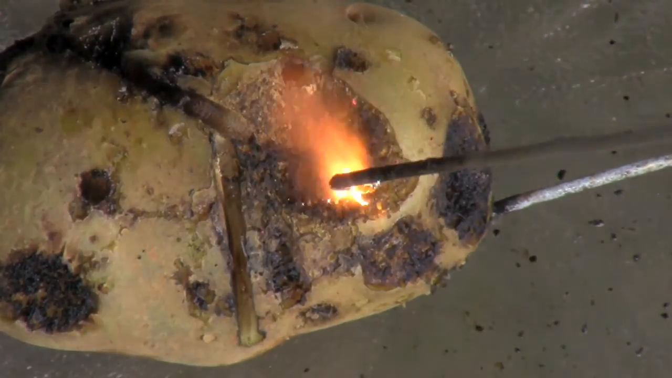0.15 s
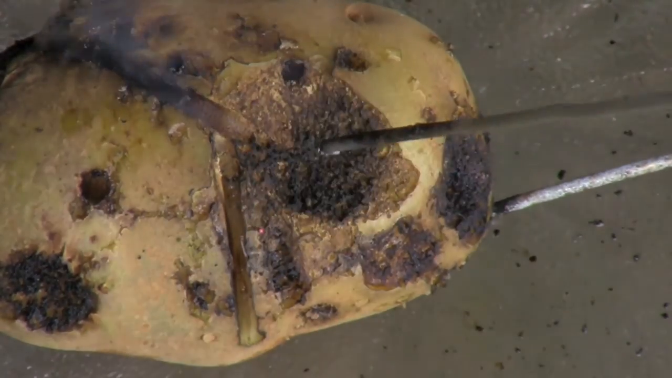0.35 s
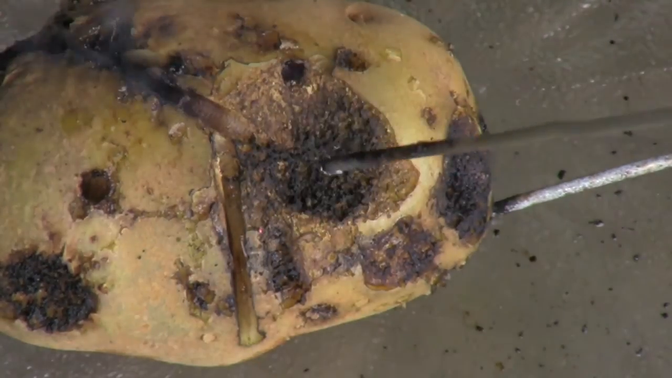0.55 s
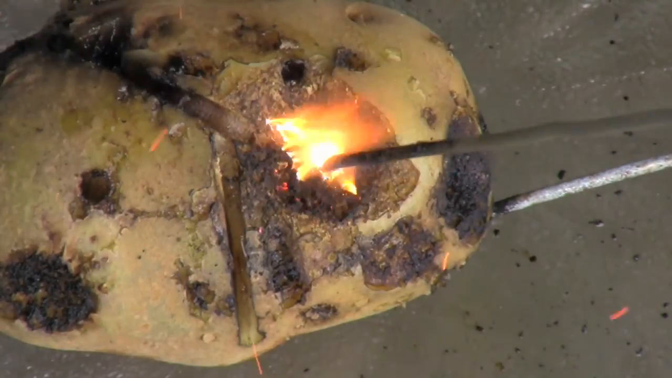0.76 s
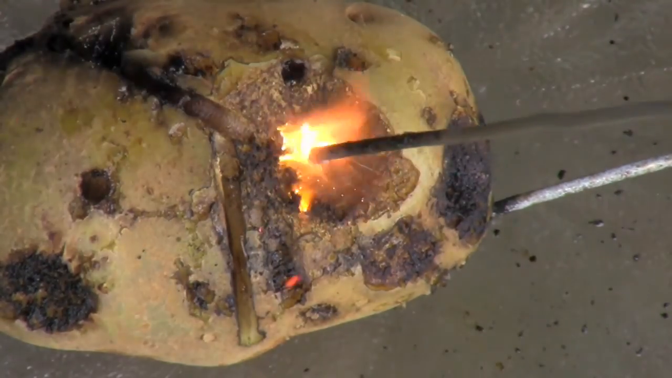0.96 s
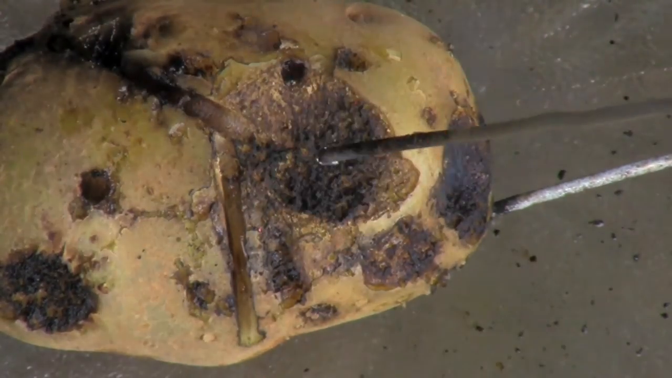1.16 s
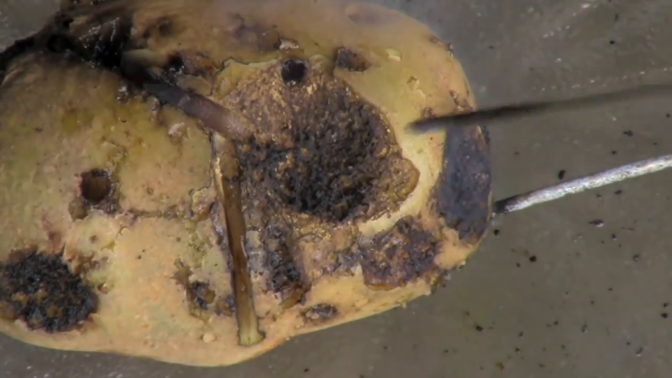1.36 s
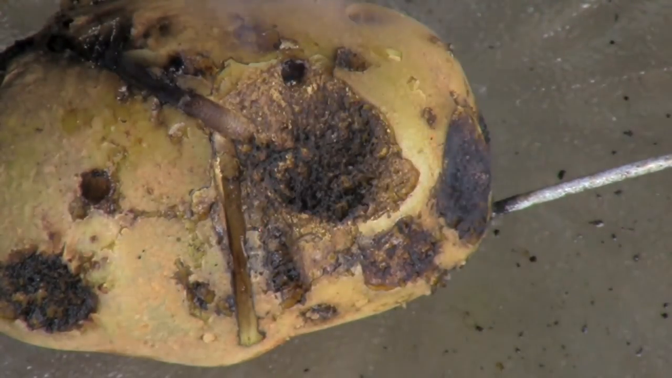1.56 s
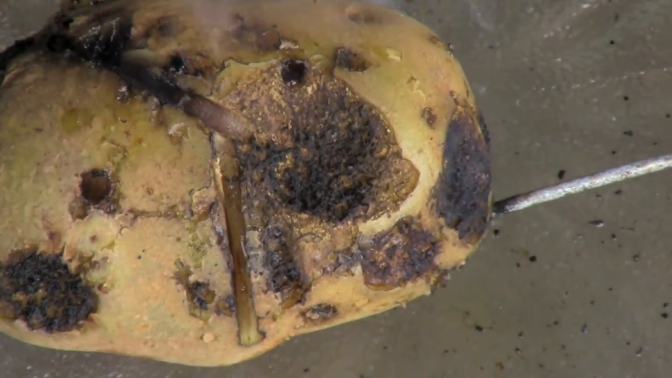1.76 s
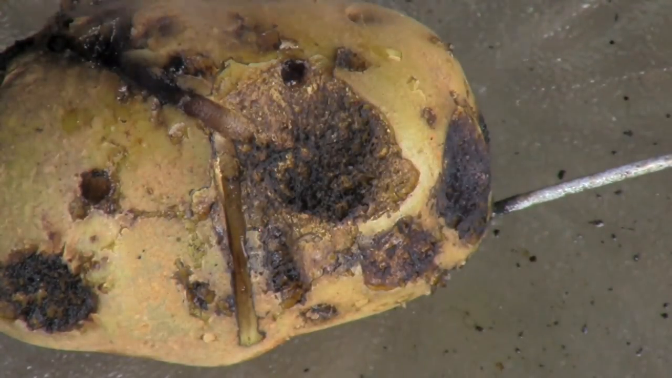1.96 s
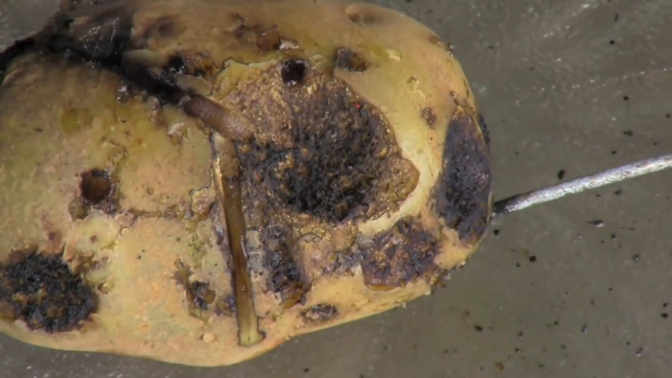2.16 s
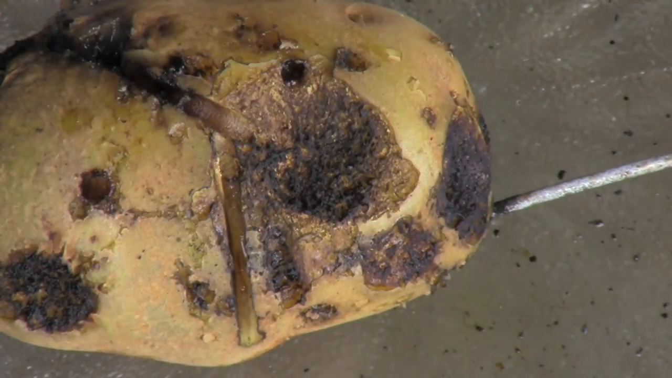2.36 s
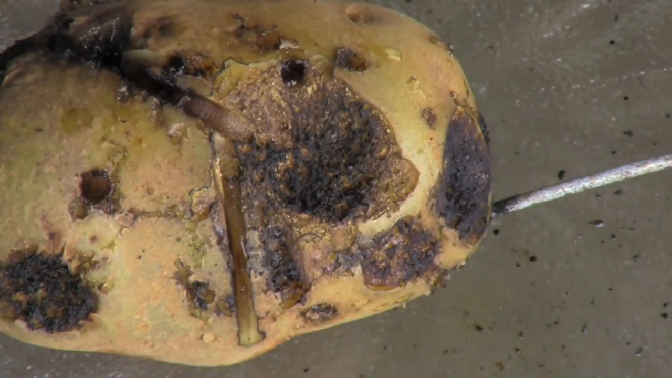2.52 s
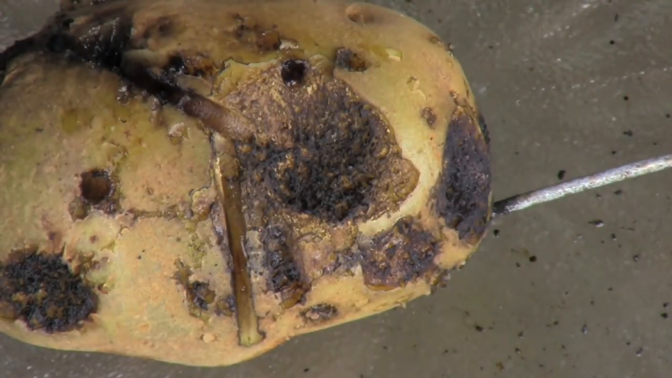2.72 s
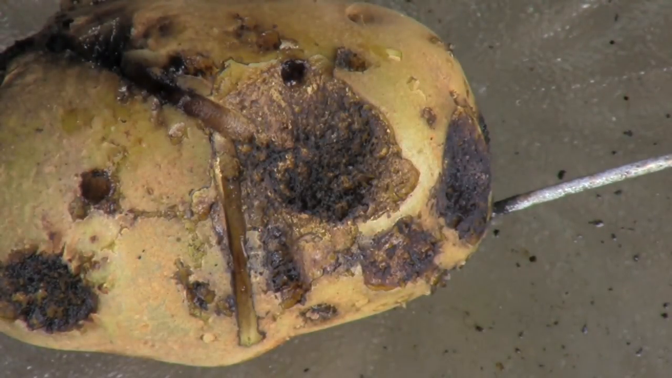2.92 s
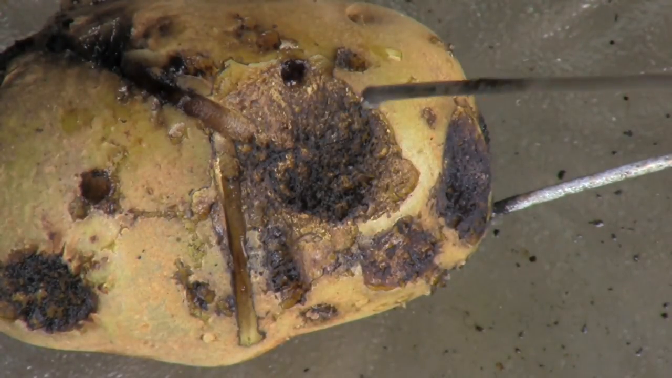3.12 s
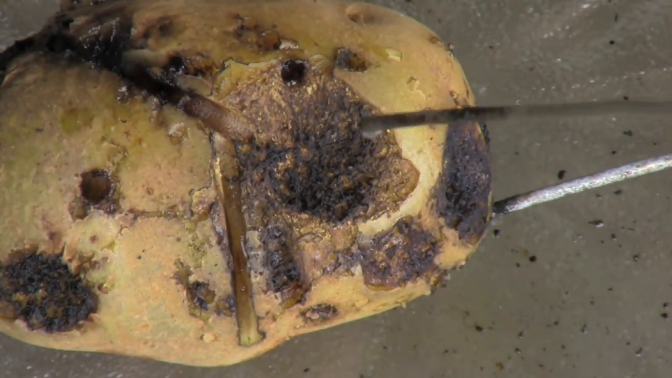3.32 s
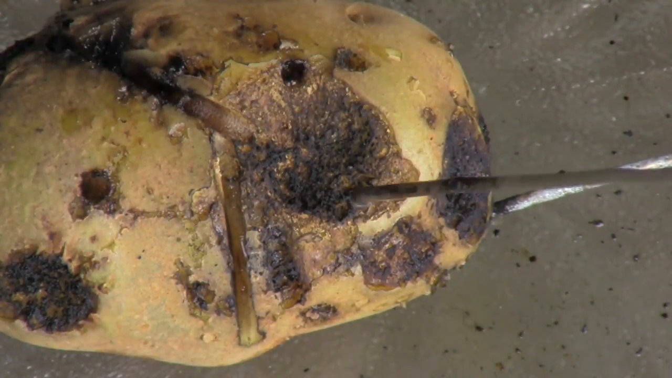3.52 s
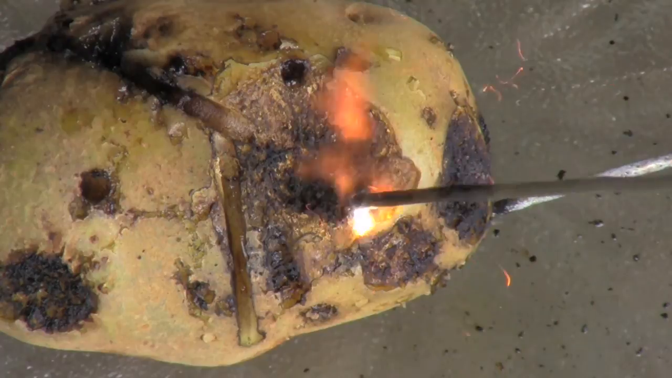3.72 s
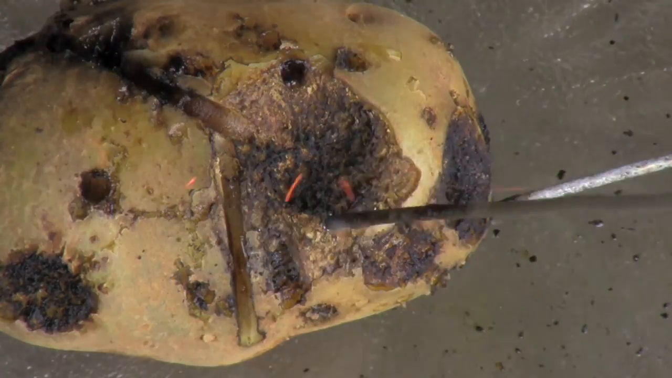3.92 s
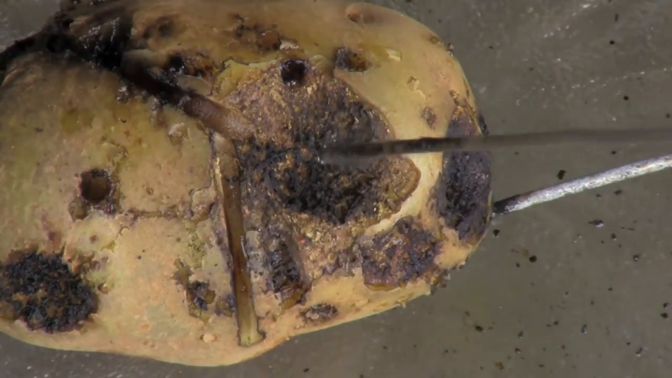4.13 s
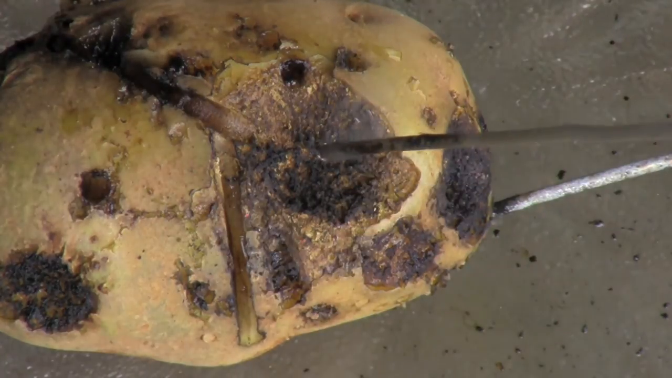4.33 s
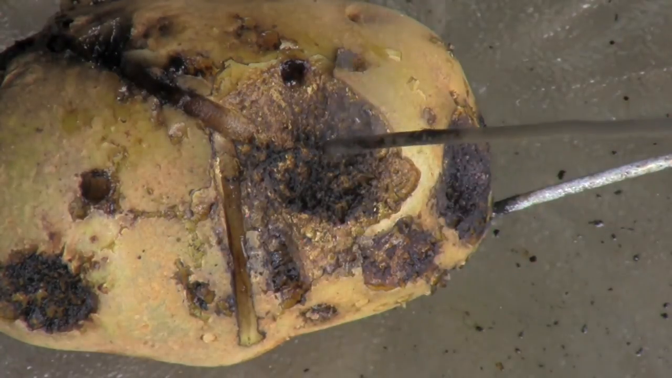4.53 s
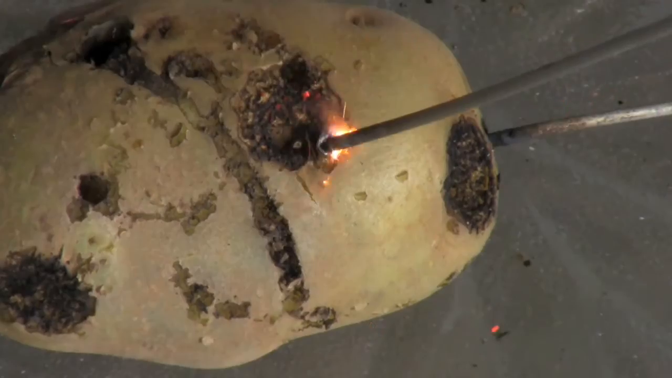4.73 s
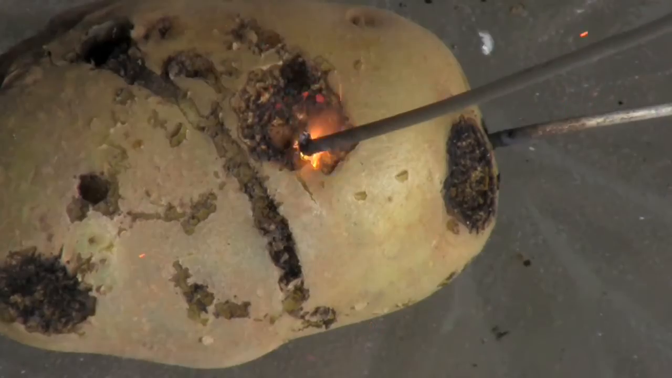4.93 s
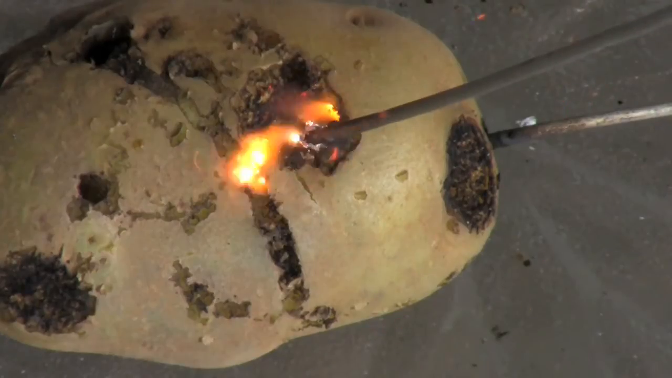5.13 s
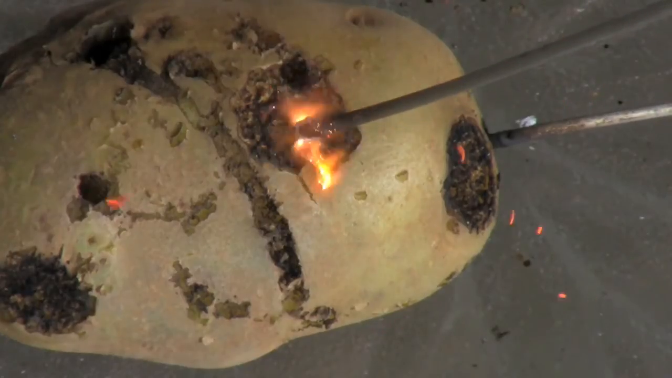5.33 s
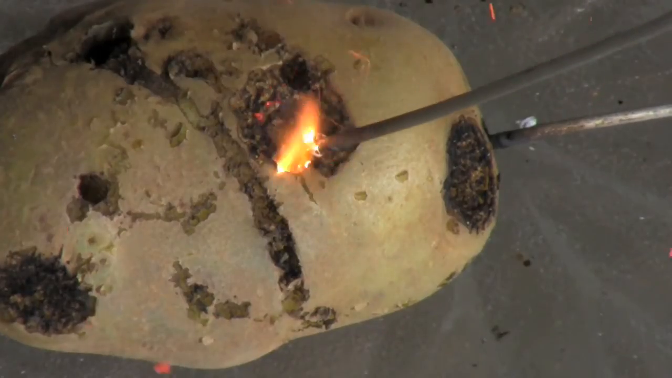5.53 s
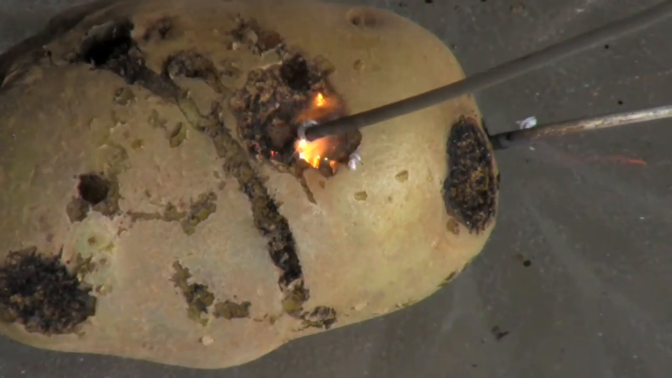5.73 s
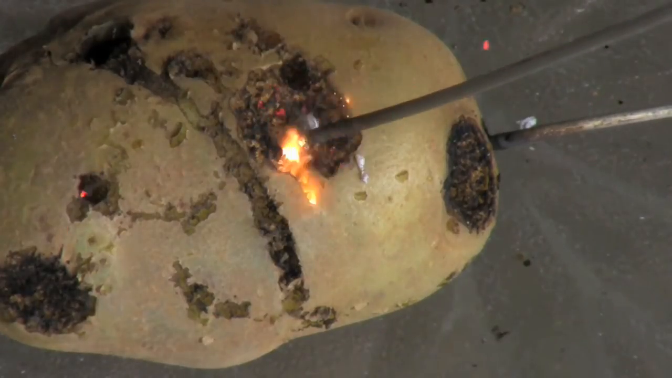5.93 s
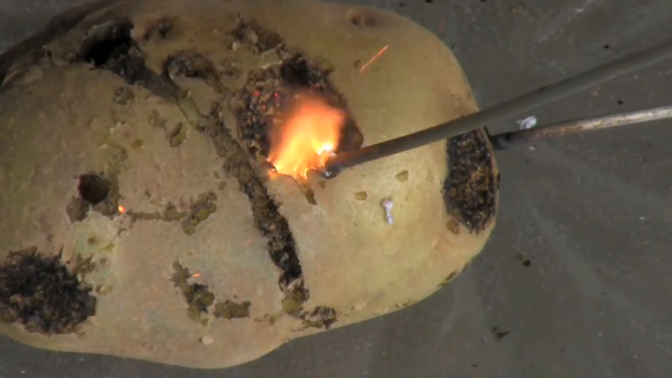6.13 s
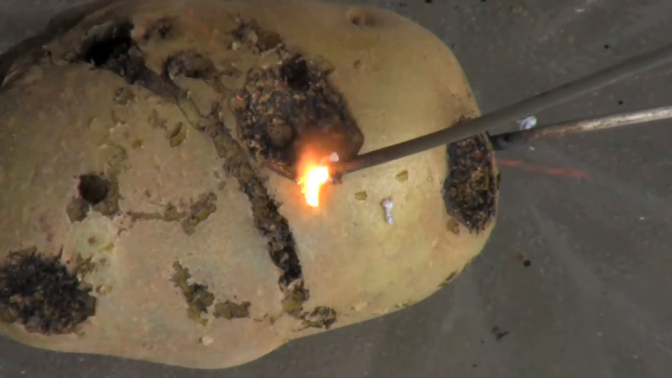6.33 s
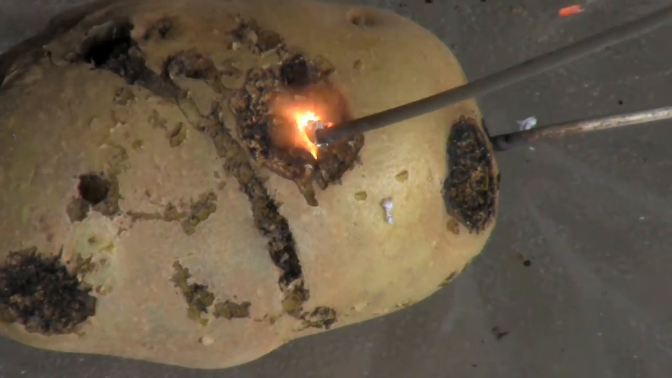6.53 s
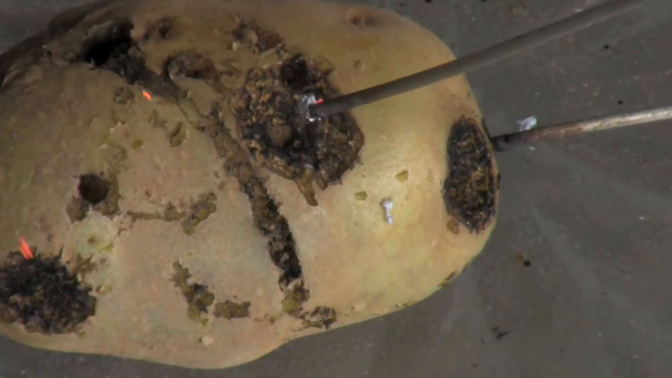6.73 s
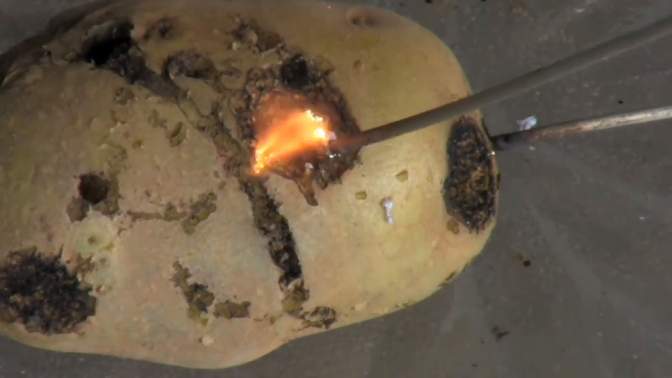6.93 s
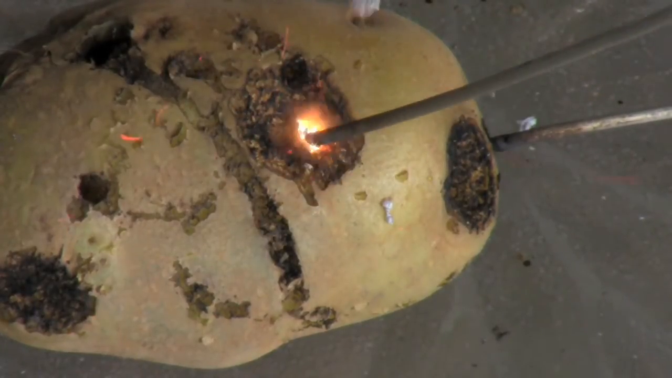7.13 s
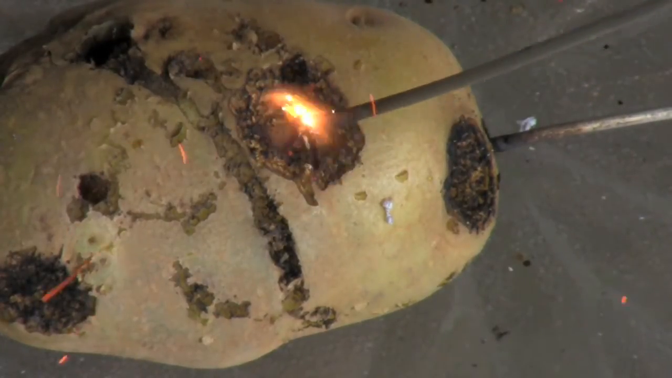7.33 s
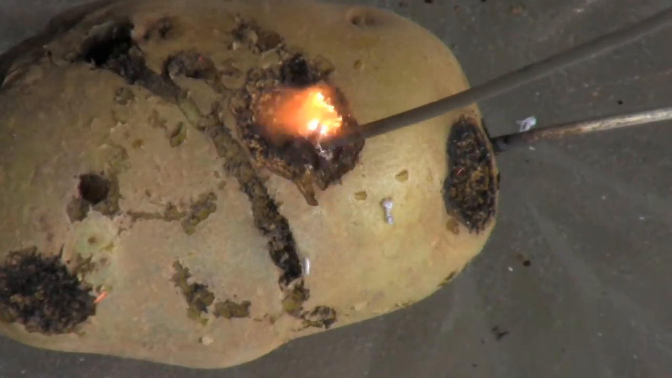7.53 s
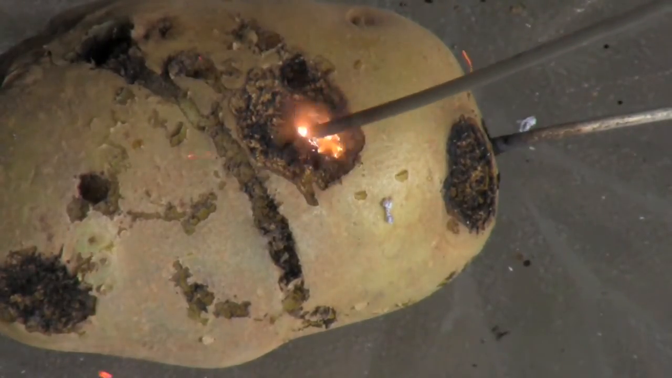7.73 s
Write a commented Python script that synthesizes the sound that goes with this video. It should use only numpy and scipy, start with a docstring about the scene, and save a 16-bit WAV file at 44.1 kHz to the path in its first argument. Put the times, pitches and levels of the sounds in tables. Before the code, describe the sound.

Close stereo pickup in a small, hard room. At once a harsh electric arc buzzes at twice the mains rate, crackling with a fluttering low flame until 0.3 s, then cuts to a short reverberant tail and faint hum. A second, brighter burst snaps on at 0.7 s and stops at 1.2 s. Low room noise rises in the pause; tiny ticks lead to a sharp double steam spit at about 2.15 s, a sizzle dying by 2.6 s, and thin, slightly falling whistles around 2.3, 3 and 3.5 s. From 3.7 to 4.0 s the arc sputters with several hard snaps. Quiet ticks and a faint high whistle follow. A long, dense rasping buzz runs from 4.7 to 6.65 s, with snaps and flame flares, most around 5.5, 5.9 and 6.5 s. After a short break, a steadier burst buzzes from 7.0 s to nearly 7.8 s.

```python
"""High-voltage arc burning a potato

A mains arc burns into a potato in five bursts, close to a microphone pair in a small hard room.
Each half cycle strikes a cluster of spark impulses, one polarity harder; noise fries in between.
Low puffs of hot gas make the fluttering flame, and sines at mains multiples make the supply's hum.
Now and then the arc sputters or the char flares. In the pause a steam pocket bursts as banded noise,
sizzles out, and steam whistles faintly from the charred skin as gliding, ragged sines."""
import sys
import numpy as np
from scipy import signal
from scipy.fft import rfft, irfft, next_fast_len
from scipy.io import wavfile
from scipy.ndimage import uniform_filter1d, minimum_filter1d, map_coordinates

SR = 44100
rng = np.random.default_rng(int(sys.argv[2]) if len(sys.argv) > 2 else 0)


def log_audio(samples):
    """Write samples as a 16-bit WAV file to the path given in sys.argv[1]."""
    # one column per channel
    frames = np.atleast_2d(samples).T
    # limit to full scale, then quantise
    limited = np.clip(frames, -1, 1)
    pcm = np.round(limited * 32767).astype(np.int16)
    wavfile.write(sys.argv[1], SR, pcm)


N = 342657
T = np.arange(N) / SR  # time in s
MAINS_HZ = 60

# arc bursts: start_s (first strong discharge), end_s, crackle_db, weak_polarity_db (against the strong one),
# scatter_db (between discharges), flame_db, hum_db
ARC_BURSTS = [(.0023, 0.292, -22, -5.5, 6, -30.5, -44.5), (0.7023, 1.19, -18.5, -7.5, 4, -36.5, -43.5),
              (3.685, 4.033, -18.5, -11, 5.5, -42.5, -41), (4.7299, 6.663, -19.5, -9.5, 2.5, -53, -43.5),
              (6.9964, 7.781, -18, -8, 0.44, -48, -41)]
# the arc loses its footing and sputters: middle_s, half_length_s, depth_db
SPUTTER_DIPS = [(.033, .01, 13), (.128, 0.014, 10.5), (.98, 0.016, 12), (3.873, 0.016, 9.5),
                (4.02, 0.027, 7), (4.73, 0.033, 16.5), (6.33, .09, 3.5), (6.428, 0.013, 9)]
# the char catches fire and the flame flares: middle_s, half_length_s, rise_db
FLAME_FLARES = [(.715, .025, 7.5), (1.09, 0.057, 8.5), (3.71, .025, 5.5), (3.925, 0.045, 12.5),
                (4.025, .035, 13.5), (5.45, .14, 14.5), (5.93, 0.25, 15.5), (6.56, .1, 14),
                (7.03, .03, 11.5)]


def amp(db):
    """Decibels to gain."""
    return 10 ** (np.asarray(db) / 20)


def unit(x):
    """x at rms 1."""
    return x / np.sqrt(np.mean(x ** 2) + 1e-20)


def along(points, hz):
    """(Hz, value) points read on a log frequency axis."""
    f, v = np.transpose(points)
    return np.interp(np.log(hz + 1), np.log(f + 1), v)


def bumps(resonances, hz):
    """The summed dB gain of bell-shaped (Hz, width Hz, dB) resonances."""
    return sum(db * np.exp(-((hz - centre) / width) ** 2 / 2) for centre, width, db in resonances)


def swells(rows, at):
    """The summed dB of bell-shaped (middle s, half length s, dB) swells at the given times."""
    return sum(db * np.exp(-((at - s) / half_s) ** 2) for s, half_s, db in rows)


def gate(start, end, fade):
    """One between two times, with ramps outside them."""
    return np.clip(np.minimum(T - start, end - T) / fade + 1, 0, 1)


def wobble(rate):
    """A smooth random curve, rate knots a second."""
    knots = rng.standard_normal(int(N * rate / SR) + 4)
    return map_coordinates(knots, [T * rate])


def filtered(x, response):
    """x filtered by response(Hz)."""
    m = next_fast_len(N + SR // 2)
    hz = np.fft.rfftfreq(m, 1 / SR)
    return irfft(rfft(x, m) * response(hz), m)[..., :N]


def noise(shape):
    """Noise of rms 1 whose dB spectrum is shape(Hz)."""
    return unit(filtered(rng.standard_normal(N), lambda hz: amp(shape(hz))))


def ring(x, shape, size=8192):
    """x through the causal, minimum-phase filter of energy 1 whose dB spectrum is shape(Hz)."""
    cepstrum = irfft(np.log(amp(shape(np.fft.rfftfreq(size, 1 / SR)))))
    # folding the cepstrum forward makes the filter answer as early as it can
    cepstrum[1:size // 2] *= 2
    cepstrum[size // 2 + 1:] = 0
    kernel = irfft(np.exp(rfft(cepstrum)))
    return signal.fftconvolve(x, kernel / np.linalg.norm(kernel))[:N]


def clusters(times, db, spread, uneven_db, count, signs=(-1, 1)):
    """A cluster of impulses around each time; db is its rms over half a mains cycle."""
    shape = (len(times), count)
    # a fast strike, a slower quench
    at = times[:, None] + spread * np.sqrt(6) * rng.triangular(-.85, -.35, 1.2, shape)
    size = rng.choice(signs, shape) * amp(uneven_db * rng.standard_normal(shape))
    half_cycle_norm = np.sqrt(SR / MAINS_HZ / 2)
    size *= (amp(db) * half_cycle_norm / np.linalg.norm(size, axis=1))[:, None]
    inside = (at >= 0) & (at < N / SR)
    return np.bincount((at[inside] * SR).astype(int), size[inside], N)[:N]


def background():
    """Room noise from all around: independent middle and side noises under one level curve."""
    # the level, which dips briefly before the fourth burst: time_s, level_db
    level = [(0, -64), (1.5, -62.5), (2.05, -54.5), (3.0, -55.5), (3.65, -55.5), (4.4, -53.5), (4.64, -56),
             (4.715, -71), (4.8, -61), (7.77, -64.5)]
    # spectrum of the air noise: frequency_hz, relative_db
    air_spectrum = [(15, -45.5), (25, -26.5), (45, -13), (86, -6), (170, -5), (270, -10.5), (330, -14),
                    (550, -12.5), (800, -12.5), (1200, -17), (1700, -24.5), (3200, -28), (6000, -37.5),
                    (11000, -45), (15000, -58)]
    # how diffuse it is: frequency_hz, side_over_mid_db
    air_width = [(60, -12.5), (180, -13.5), (550, -3.5), (1650, -5.5), (4970, -2.5), (15000, 0.5)]
    gain = amp(np.interp(T, *np.transpose(level)))
    mid, side = (gain * noise(lambda hz: along(air_spectrum, hz)) for _ in range(2))
    return mid, filtered(side, lambda hz: amp(along(air_width, hz)))


def mains_lines(lines):
    """Sines at mains multiples, each with its own phase and wavering level."""
    phase = 2 * np.pi * MAINS_HZ * T
    out = np.zeros(N)
    for multiple, db in lines:
        out += amp(db + wobble(12)) * np.sin(round(multiple) * phase + rng.uniform(0, 2 * np.pi))
    return np.sqrt(2) * out  # so that the dB are rms


def hum(fade=0.01):
    """The arc's heat swings with the mains current, more so when it flares; a faint hum always stays."""
    # harmonics under load, against each burst's hum level: mains_multiple, relative_db
    load_lines = [(1, -14.5), (2, 1.5), (3, -14), (4, 2), (5, -11), (6, -9.5), (7, -13), (8, -9.5),
                  (10, -14)]
    # the supply without load: mains_multiple, level_db
    idle_lines = [(1, -68.5), (2, -75), (3, -70.5), (4, -72)]
    hum_per_flame = .2  # a bigger flame draws more current: dB of hum per dB of flare
    load = sum(gate(start + fade, end, fade) * amp(hum_db) for start, end, *_, hum_db in ARC_BURSTS)
    load = load * amp(hum_per_flame * swells(FLAME_FLARES, T))
    return load * mains_lines(load_lines) + mains_lines(idle_lines)


def frying():
    """Thin, very uneven noise between the discharges, sinking when the arc sputters."""
    frying_db = -10.5  # against the crackle
    level = np.zeros(N)
    for start, end, crackle_db, *_ in ARC_BURSTS:
        level += gate(start, end, 0.0034) * amp(crackle_db + frying_db)
    grains = rng.standard_normal(N) * amp(7.6 * rng.standard_normal(N))
    return level * amp(-swells(SPUTTER_DIPS, T)) * unit(grains)


def surroundings(sparks):
    """Gives the sparks their spectrum and the resonances of the surroundings."""
    # the sparks' smooth spectrum: frequency_hz, relative_db
    spark_spectrum = [(30, -40), (80, -20.5), (120, -7.5), (300, 0.5), (600, -3.5), (1200, 0.5),
                      (2500, 0.5), (5200, -3.5), (8500, -6), (11000, -11.5), (13000, -13.5), (14300, -32),
                      (15200, -42.5)]
    # resonances and notches before the microphones are moved: centre_hz, width_hz, gain_db
    colour_before = [(208, 14, -6.5), (410, 46, -2.5), (555, 10, 5.5), (740, 83, 4.5), (1000, 70, 1.5),
                     (1800, 220, 6.5), (2650, 240, -1.5), (3390, 440, 9), (4230, 530, 8.5),
                     (6300, 120, 2.5), (7600, 350, 4), (11900, 250, -9)]
    # the same after the move: centre_hz, width_hz, gain_db
    colour_after = [(210, 8.9, -5), (324, 23, 3), (506, 18, -12), (766, 52, 4.5), (1210, 100, -3.5),
                    (1940, 180, 5.5), (3120, 274, 9.5), (3950, 357, 11.5), (6200, 170, 4.5),
                    (7550, 360, 6.5), (11850, 250, -5)]
    moved_s = 4.7

    def heard(resonances):
        return ring(sparks, lambda hz: along(spark_spectrum, hz) + bumps(resonances, hz))

    return np.where(T < moved_s, heard(colour_before), heard(colour_after))


def arc():
    """Sparks and a puff of hot gas at every half cycle; apart from the hard snaps all sink in a sputter."""
    # the hardest breakdowns and stray flashovers: time_s, level_db (over their half cycle)
    snaps = [(.0516, -9), (0.2351, -15.5), (0.7048, -8.5), (.869, -16.5), (1.154, -12), (3.69, -9),
             (3.704, -13), (3.8364, -12), (3.902, -6.5), (3.92, -9.5), (3.9702, -13), (3.9886, -10.5),
             (4.0135, -14.5), (4.0353, -11.5), (4.817, -13), (4.897, -13), (5.1965, -12.5), (5.382, -10.5),
             (5.499, -11.5), (5.9986, -12), (6.197, -14.5), (6.4633, -10.5), (6.4813, -12), (6.579, -14.5),
             (6.686, -19.5), (6.6136, -14), (6.991, -23.5), (6.9991, -10.5), (7.0153, -12)]
    # spectrum of the flame's puffs: frequency_hz, relative_db
    flame_spectrum = [(40, -49), (85, -27), (125, -8.5), (170, 8), (210, -9.5), (320, -7.5), (500, -14.5),
                      (800, -13), (2000, -40.5), (6000, -86.5)]
    strongest_db = -15  # the supply bounds an ordinary discharge
    spread_s = .0014  # how long the sparks of one discharge scatter
    flicker_db, flicker_rate = 6.5, 22  # the flame's own unrest, and its changes a second
    half = 1 / MAINS_HZ / 2
    snap_s, snap_db = np.transpose(snaps)
    sparks = clusters(snap_s - .0004, snap_db, spread=.001, uneven_db=5.0, count=36)
    puffs = np.zeros(N)
    for start, end, crackle_db, weak_db, scatter_db, flame_db, _ in ARC_BURSTS:
        s = np.arange(start, end, half)
        # every second half cycle breaks down more gently
        polarity_db = 20 * np.log10(unit(amp(weak_db * (np.arange(len(s)) % 2))))
        drive_db = polarity_db - swells(SPUTTER_DIPS, s)
        chance = rng.standard_normal(len(s))
        spark_db = np.minimum(crackle_db + drive_db + scatter_db * chance, strongest_db)
        # a hard breakdown takes its whole half cycle
        free = np.abs(s[:, None] - snap_s).min(axis=1) > half / 2
        sparks += clusters(s[free], spark_db[free], spread_s, uneven_db=2.5, count=40)
        flicker = flicker_db * np.interp(s, T, wobble(flicker_rate))
        puff_db = flame_db + drive_db + swells(FLAME_FLARES, s) + flicker + 3 * chance
        # heated gas always pushes outwards: one sign only
        puffs += clusters(s, puff_db, spread=0.00072, uneven_db=2, count=1, signs=[1])
    return surroundings(sparks + frying()) + ring(puffs, lambda hz: along(flame_spectrum, hz))


def room(x, wet_db=-9, delay=0.0051, size=8820):
    """The walls' answer dies at its own speed per frequency; its fine grain is redrawn slice by slice."""
    # decay time: frequency_hz, t60_s
    decay = [(100, 0.49), (260, 0.4), (700, 0.42), (1840, 0.46), (3800, 0.4), (7000, 0.23), (12000, 0.21)]
    # colour of the reverberation: frequency_hz, gain_db
    wall_colour = [(200, 2.5), (850, 4), (1800, -2), (2500, 1), (3800, -13.5), (5500, 5), (10000, 2)]
    wet = np.zeros(N + 2 * SR)
    for first in range(0, N, size):  # fresh tails avoid the fixed colour of a single random one
        hz, t, z = signal.stft(rng.standard_normal(SR * 3 // 4), SR, nperseg=256)
        fall = amp(-60 * t / along(decay, hz)[:, None])
        tail = signal.istft(z * fall, SR, nperseg=256)[1]
        # the nearest wall answers after a short delay
        tail *= np.clip(np.arange(len(tail)) / SR / delay - 1, 0, 1)
        answer = signal.fftconvolve(x[first:first + size], tail / np.linalg.norm(tail))
        wet[first:first + len(answer)] += answer
    return amp(wet_db) * filtered(wet[:N], lambda hz: amp(along(wall_colour, hz)))


def spits():
    """Steam pockets burst, spit and tick in the hot char: short decaying hisses, each in its own band."""
    # the spits: start_s, level_db, centre_hz, width_octaves, t60_s
    pockets = [(1.47, -65.5, 4470, .9, .04), (1.648, -67.5, 5010, 1.2, 0.056),
               (1.825, -67, 2700, .2, 0.037), (1.975, -56, 2650, .15, .04), (2.123, -45.5, 4870, 1.6, 0.54),
               (2.147, -19.5, 5440, 0.34, 0.049), (2.155, -20.5, 3310, 0.39, 0.063),
               (2.173, -31, 1960, 0.9, 0.11), (2.199, -29.5, 2420, 1.2, .12),
               (3.205, -67, 4500, 0.86, 0.054), (4.378, -55, 2740, .15, .04), (4.41, -63, 5470, .1, 0.057),
               (4.445, -55, 4600, 0.29, .06), (4.52, -58, 3970, 0.32, .15), (4.6, -60, 4220, 0.24, .2)]
    treble_loss = [(8000, -1.5), (11500, -6.5), (14500, -27.5)]  # (Hz, dB)
    out = np.zeros(N)
    for s, db, centre_hz, octaves, t60 in pockets:
        age = np.maximum(T - s, 0)

        def band(hz):
            distance = np.log2((hz + 1) / centre_hz) / octaves
            return -20 * np.log10(1 + distance ** 2)

        hiss = noise(lambda hz: band(hz) + along(treble_loss, hz))
        onset = 1 - np.exp(-age / 0.0023)
        out += amp(db - 60 * age / t60) * onset * hiss
    return out


def sizzle():
    """Steam escapes as noise coloured by the pores, dying as the burst pocket's pressure falls."""
    # spectrum of the escaping steam: frequency_hz, relative_db
    steam_spectrum = [(800, -29.5), (1500, -8), (2300, -10), (3500, -5), (5200, -12), (8000, -14),
                      (11000, -19), (13000, -34), (15000, -52)]
    # resonances of the hiss: centre_hz, width_hz, gain_db
    pore_resonances = [(3600, 150, 4.5), (4980, 180, 8), (7730, 300, 5.5), (10330, 400, 4)]
    start_s, end_s, start_db, fall_db_per_s = 2.17, 2.66, -47.5, 36
    level_db = start_db - fall_db_per_s * np.maximum(T - start_s, 0)
    hiss = noise(lambda hz: along(steam_spectrum, hz) + bumps(pore_resonances, hz))
    return gate(start_s, end_s, .05) * amp(level_db) * hiss


def whistles(waver_db=3):
    """Steam sings through pores, each swelling and fading; a ragged jet flutters and throws side tones."""
    # the whistles: loudest_s, pitch_hz (then), glide_octaves_per_s, peak_db, rise_s, fall_s,
    # raggedness (scales the phase swing in rad)
    tones = [(2.315, 2330, -.15, -44.5, .03, 0.14, 0.56), (2.44, 2174, -0.22, -58, .14, .2, .6),
             (2.905, 2673, -0.067, -52, 0.103, 0.27, 1.9), (3.09, 2753, -.03, -51.5, 0.34, 0.17, .3),
             (3.54, 2750, 0.1, -49, 0.17, .12, 0.42), (3.62, 2800, -.05, -53.5, .12, .15, 2.5),
             (4.22, 4980, -0.052, -67, 0.088, 0.22, .3), (4.5, 4920, -0.068, -56, 0.031, 0.067, .3)]
    range_db = 20  # what a whistle gains in its rise time and loses in its fall time
    flutter_hz, flutter_unrest = 377, 0.068  # the jet's flapping and its relative wander
    flutter_share, turbulent_share = 0.37, 0.37  # the two parts of its raggedness
    flutter = np.sin(2 * np.pi * np.cumsum(flutter_hz * (1 + flutter_unrest * wobble(80))) / SR)
    swing = flutter_share * flutter + turbulent_share * wobble(830)
    drift = 1 + .005 * wobble(120)  # slight unsteadiness of pitch
    waver = waver_db * wobble(60)
    out = np.zeros(N)
    for s, pitch_hz, glide, db, rise_s, fall_s, ragged in tones:
        pitch = pitch_hz * 2 ** (glide * (T - s)) * drift
        phase = 2 * np.pi * np.cumsum(pitch) / SR
        fade_db = range_db * np.maximum((s - T) / rise_s, (T - s) / fall_s)
        out += amp(db - fade_db + waver) * np.sin(phase + ragged * swing)
    return out


def scene():
    """Arc and steam reach a close microphone pair that differs mostly in the treble, amid background."""
    # left-right difference of the near sounds: frequency_hz, side_over_mid_db
    near_width = [(60, -39.5), (200, -51), (500, -23.5), (1200, -38), (2500, -38), (4000, -22.5),
                  (8000, -15), (12000, -5)]
    air, air_side = background()
    near = arc() + spits() + sizzle() + whistles()
    centre = near + room(near) + hum()
    # a random sway keeps the left-right difference of all near sounds diffuse
    sway = np.sqrt(2) * np.sin(3 * wobble(160))
    # 1j turns the side signal by a quarter cycle
    near_side = filtered(centre * sway, lambda hz: 1j * amp(along(near_width, hz)))
    mid, side = centre + air, near_side + air_side
    return np.array([mid + side, mid - side])


def record(dry, ceiling=0.87, hold=0.0038):
    """A fast limiter holds down the highest peaks; nothing passes above the band limit."""
    top_hz = 15500
    size = max(int(hold * SR), 3)
    needed = np.minimum(1, ceiling / (np.abs(dry).max(axis=0) + 1e-9))
    gain = uniform_filter1d(minimum_filter1d(needed, size), size)
    return filtered(dry * gain, lambda hz: hz < top_hz)


dry = scene()
out = record(dry)
log_audio(out)
```